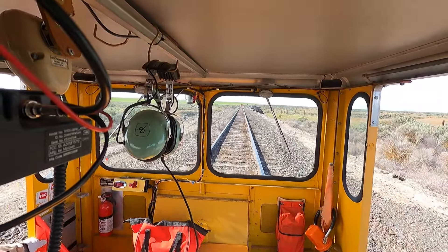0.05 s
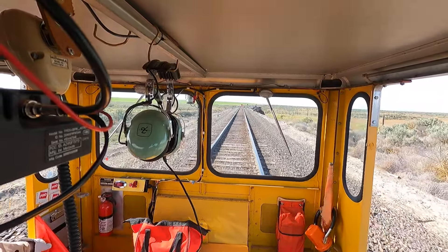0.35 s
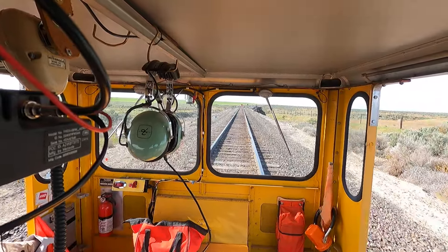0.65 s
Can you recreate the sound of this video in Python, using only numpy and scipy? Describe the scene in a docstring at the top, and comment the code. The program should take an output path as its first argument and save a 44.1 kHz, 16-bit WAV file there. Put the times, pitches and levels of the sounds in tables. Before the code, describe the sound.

A small railcar runs at steady speed, heard from the middle of its steel cab. A low engine drone and deep heaving rumble continue throughout, over a light rolling hiss and faint metallic ringing. Loose fittings rattle close by in irregular fits, growing busier near the end. The wheels clack over rail joints a few times in the first four seconds, and dips in the track give occasional deep thumps.

```python
"""Inside the steel cab of a small railcar at steady speed on jointed track, one microphone mid-cab.
The engine drones under the rumble of the body, which heaves on its springs and thumps over dips.
Below the floor the wheels roll with a hiss and clack over rail joints; rolling keeps a wheel and
a panel ringing. Close by, loose metal fittings chatter in fits as the car shakes, and the buckles
of small hanging gear tick."""
import sys
import numpy as np
from scipy import signal
from scipy.fft import rfft, irfft
from scipy.io import wavfile
from scipy.ndimage import uniform_filter1d

SR = 44100
rng = np.random.default_rng(int(sys.argv[2]) if len(sys.argv) > 2 else 0)


def digitize_waveform(pressure):
    """Quantize a signal to 16-bit integers and store it at the path in sys.argv[1].

    Rows of a 2-D input are taken as channels; values are limited to [-1, 1].
    """
    field = np.atleast_2d(pressure).T
    bounded = np.clip(field, -1, 1)
    quanta = np.round(bounded * 32767).astype(np.int16)
    wavfile.write(sys.argv[1], SR, quanta)


N = 283106
TIME = np.arange(N) / SR


def amp(db):
    return 10 ** (np.asarray(db) / 20)


def unit_rms(x):
    return x / np.sqrt(np.mean(x ** 2) + 1e-20)


def curve(rows):
    """Rows of (seconds, value) read at every sample."""
    return np.interp(TIME, *np.transpose(rows))


def add(mix, start_s, sound):
    part = mix[max(round(start_s * SR), 0):][:len(sound)]
    part += sound[:len(part)]


def decay(t, t60):
    return np.exp(-np.log(1000) * t / t60)


def drift(rate_hz):
    """A random wander of unit rms, mostly slower than the rate."""
    hz = np.arange(N // 2 + 1) * SR / N
    return unit_rms(irfft(rfft(rng.standard_normal(N)) * np.exp(-(hz / rate_hz) ** 2), N))


def resonate(x, colour, modes=(), size=16384):
    """Causal filter of unit energy: a broad colour with resonances that ring on."""
    hz = abs(np.fft.fftfreq(size, 1 / SR))
    points_hz, points_db = np.transpose(colour)
    db = np.interp(np.log(hz + 1), np.log(points_hz), points_db)
    for centre, width, lift in modes:
        db += lift / (1 + (2 * (hz - centre) / width) ** 2)
    minimum_phase = np.exp(np.conj(signal.hilbert(np.log(amp(db)))))
    response = np.fft.ifft(minimum_phase).real[:size // 2]
    return signal.fftconvolve(x, response / np.linalg.norm(response))[:N]


def scatter(t60):
    """One blow spread into dense dying reflections by the metal and the cab."""
    t = np.arange(int(t60 * SR)) / SR
    return rng.choice([-1., 1.], len(t)) * decay(t, t60)


def blows(rows, t60, rise_s):
    """A track of scattered blows from rows of (seconds, dB)."""
    out = np.zeros(N)
    for start, db, *_ in rows:
        blow = scatter(t60)
        attack = 1 - np.exp(-np.arange(len(blow)) / (rise_s * SR))
        add(out, start, amp(db) * attack * blow)
    return out


def bout_power(rows, rise_s=0.0034, fall_s=0.024):
    """Summed power of bouts that each build up, hold and die away."""
    power = np.zeros(N)
    for start, length, db in rows:
        t = np.maximum(TIME - start, 0)
        attack = 1 - np.exp(-t / rise_s)
        release = np.exp(-np.maximum(t - length, 0) / fall_s)
        power += (amp(db) * attack * release) ** 2
    return power


# The crankshaft's speed. Each row: time in seconds, turns per second.
CRANK_SPEED = [(0, 33.67), (1.5, 33.81), (2.2, 33.6), (3.2, 33.31), (6.42, 33.44)]
# Engine tones in the cab. Each row: multiple of the crankshaft speed, rms level in dB.
ENGINE_ORDERS = [(1, -25), (2, -27.5), (2.5, -35), (3, -27), (4, -46.5), (5, -41.5), (6, -46), (7, -56)]
# Hums of the drive train. Each row: frequency in Hz, rms level in dB.
DRIVE_HUMS = [(80, -39), (110, -40), (195, -46.5), (212, -47), (238.5, -52)]
def engine(order_waver=0.21, hum_waver=0.79):
    """The engine drones at orders of the crankshaft, slightly uneven, over wandering drive-train hums."""
    turns = np.cumsum(curve(CRANK_SPEED)) / SR
    out = np.zeros(N)
    for multiple, db in ENGINE_ORDERS:
        phase = 2 * np.pi * (multiple * turns + rng.random())
        out += amp(db) * unit_rms((1 + order_waver * drift(6.7)) * np.sin(phase))
    for hz, db in DRIVE_HUMS:
        phase = 2 * np.pi * (hz * TIME + rng.random()) + 1.49 * drift(4.5)
        out += amp(db) * unit_rms((1 + hum_waver * drift(10.3)) * np.sin(phase))
    return out


# The body's rumble from inside. Each row: frequency in Hz, relative level in dB.
RUMBLE_COLOUR = [(3, -2), (10, 1), (22, -1), (40, -9.5), (60, -19), (105, -17), (128, -24), (200, -24.5),
                 (232, -29), (262, -36.5), (330, -44), (1500, -120)]
# The body heaving on its springs. Each row: time in seconds, relative dB before scaling by heave_depth.
BODY_HEAVE = [(0, -17), (1.3, -18.5), (1.8, -17), (2.6, -22), (3.1, -17), (3.9, -17), (4.4, -17.5),
              (4.8, -18), (5.35, -17.5), (6.42, -16)]
# Rumble above the deepest band. Each row: time in seconds, relative dB before scaling by upper_depth.
UPPER_RUMBLE_LEVEL = [(0.0, -34.5), (1.0, -27.5), (3.2, -31.5), (3.27, -38.5), (4.34, -27.5), (4.52, -34),
                      (5.63, -30), (6.01, -32), (6.11, -23.5), (6.42, -37.5)]
def body_rumble(level_db=-15, heave_depth=0.68, upper_depth=0.99, split_hz=58):
    """The deepest rumble swells as the car heaves; the rumble above it swells and sinks irregularly."""
    rumble = amp(level_db) * unit_rms(resonate(rng.standard_normal(N), RUMBLE_COLOUR))
    deep = signal.sosfiltfilt(signal.butter(4, split_hz, fs=SR, output="sos"), rumble)
    upper = rumble - deep
    out = np.zeros(N)
    for band, depth, swell in [(deep, heave_depth, BODY_HEAVE), (upper, upper_depth, UPPER_RUMBLE_LEVEL)]:
        steady = band / np.sqrt(uniform_filter1d(band ** 2, size=9000))
        out += band.std() * unit_rms(steady * amp(depth * curve(swell)))
    return out


# Rolling noise from under the floor. Each row: frequency in Hz, relative level in dB.
ROLLING_COLOUR = [(200, -8), (380, 0.5), (700, -5.5), (820, -10.5), (1250, -9), (1800, -11.5),
                  (3100, -10.5), (4300, -17.5), (5200, -22), (5900, -28), (7200, -29), (8600, -34.5),
                  (10400, -37.5), (15500, -41)]
# Resonances and hollows of the steel body. Each row: centre in Hz, width in Hz, lift in dB.
STEEL_MODES = [(497.6, 17, 6.5), (590, 19, 5), (683, 23, 6.5), (723, 14, 5), (845, 20, 7), (1023, 45, 2.5),
               (1055, 71, 3.5), (1256, 46, 4.5), (1390, 87, -4), (1544, 73, 10.5), (1554, 51, -4.5),
               (1801, 206, 7), (2207, 13, 7.5), (2202, 10.4, 5), (2260, 57, 3.5), (2478, 76, -9.5),
               (2685, 31, 2.5), (2840, 25, -4.5), (2802, 43, 3.5), (2859, 193, 9), (2970, 6.2, 8.5),
               (3040, 20, -0.5), (3156, 68, 5), (3370, 9.8, 6), (3555, 95, 3.5), (3770, 51, 7),
               (4450, 250, -5), (5086, 420, 4.5), (5290, 29, 6)]
def rolling(shake_db, level_db=-37.5, shake_share=0.14, flutter_db=0.5):
    """Rail roughness drives the steel, a little harder where the car shakes."""
    drive_db = shake_share * shake_db + flutter_db * drift(33)
    roughness = rng.standard_normal(N) * amp(drive_db)
    return amp(level_db) * unit_rms(resonate(roughness, ROLLING_COLOUR, STEEL_MODES))


# A wheel ringing as it rolls. Each row: time in seconds, rms level in dB.
WHEEL_RING_LEVEL = [(0, -50), (0.35, -55), (0.7, -52), (1.2, -52), (1.5, -47), (2.3, -51), (3.5, -53),
                    (4.3, -52), (4.8, -56), (5.9, -56), (6.42, -50)]
# A cab panel ringing up. Each row: start in seconds, length in seconds, held level in dB.
PANEL_BOUTS = [(0.01, 0.14, -41), (1.68, 0.069, -41.5), (3.93, 0.06, -41.5), (4.3, 0.054, -39.5),
               (4.62, 0.11, -41.5), (6.35, 0.053, -43)]
def wheel_and_panel_ring(wheel_hz=976.0, panel_hz=359.6, panel_rest_db=-51):
    """Rolling keeps a wheel mode and a cab panel ringing, each coming and going."""
    wheel = amp(curve(WHEEL_RING_LEVEL))
    panel = np.sqrt(amp(panel_rest_db) ** 2 + bout_power(PANEL_BOUTS))
    out = np.zeros(N)
    for hz, width_hz, level in [(wheel_hz, 22, wheel), (panel_hz, 15, panel)]:
        swing = drift(width_hz) + 1j * drift(width_hz)  # shaken at random, it wanders in size and phase
        swing /= np.sqrt(uniform_filter1d(abs(swing) ** 2, size=9000) / 2)
        out += level * (swing * np.exp(2j * np.pi * hz * TIME)).real
    return out


# Fits of shaking. Each row: start in seconds, length in seconds, strength in dB.
SHAKE_FITS = [(0.055, 0.052, -34), (0.135, 0.031, -39.5), (0.665, 0.023, -42.5), (0.795, 0.03, -32),
              (0.845, 0.04, -36.5), (1.33, 0.1, -40), (1.683, 0.06, -33), (1.755, 0.11, -32),
              (1.968, 0.032, -35), (2.105, 0.083, -34), (2.289, 0.052, -36.5), (2.615, 0.037, -37),
              (2.849, 0.063, -37.5), (3.0, 0.13, -35.5), (3.17, 0.06, -40.5), (3.32, 0.024, -40.5),
              (3.568, 0.17, -40), (3.835, 0.079, -43), (3.968, 0.057, -29), (4.055, 0.021, -31.5),
              (4.273, 0.17, -38), (4.475, 0.093, -34.5), (4.792, 0.02, -35.5), (4.903, 0.055, -31.5),
              (5.14, 0.15, -31.5), (5.3, 0.1, -29.5), (5.544, 0.078, -32), (5.657, 0.057, -35),
              (5.742, 0.13, -32.5), (5.926, 0.033, -34), (6.176, 0.025, -33), (6.241, 0.066, -31)]
def shaking(idle_db=-45.5, swing_db=2, swing_hz=18):
    """How hard the car shakes its fittings, in dB: fits over a faint, restless idle."""
    idle = amp(idle_db + swing_db * np.tanh(drift(swing_hz)))
    return 10 * np.log10(idle ** 2 + bout_power(SHAKE_FITS))


def chatter(shake_db, gain_db=-0.5, contacts_per_s=1000, t60=0.03):
    """Shaken fittings buzz against the steel; each contact leaves a short scatter, and these overlap."""
    contacts = (rng.random(N) < contacts_per_s / SR).astype(float)
    power_kept = decay(1 / SR, t60) ** 2  # from one sample to the next
    power = signal.lfilter([1], [1, -power_kept], contacts) + 1e-3
    power /= uniform_filter1d(power, size=1000)
    return amp(gain_db + shake_db) * np.sqrt(power) * rng.standard_normal(N)


# Loose metal close by. Each row: frequency in Hz, relative level in dB.
FITTING_COLOUR = [(300, -30), (900, -17.5), (1400, -14.5), (1700, -5.5), (2400, 0.5), (2900, 0), (3200, 2),
                  (3800, -3.5), (4350, -20), (5150, -17), (5900, -22), (8000, -64), (15000, -64)]
# Single hard knocks of the fittings. Each row: start in seconds, relative level in dB, ping in Hz.
FITTING_KNOCKS = [(0.0582, -48, 2940), (0.6803, -27, 2900), (0.8049, -28, 2850), (1.5702, -21.5, 2920),
                  (1.775, -19, 2710), (1.9787, -32, 2860), (2.111, -25, 2810), (3.033, -22, 2820),
                  (4.519, -27, 2800), (4.9032, -23, 2850), (4.95, -18, 2760), (5.1641, -18, 2880),
                  (5.3065, -21, 3290), (5.3468, -24, 2880), (5.3919, -19, 3180), (5.5472, -24, 3030),
                  (5.7876, -18, 3020), (5.8219, -16, 2890), (5.9183, -17, 2910), (5.9348, -19.5, 2920),
                  (6.175, -20, 2890), (6.2524, -23, 2780)]
def loose_fittings(shake_db, knock_db=-11, ping_db=-9.5, t60=0.11):
    """Chatter and single knocks ring the steel of the cab; each knocked piece adds its own short ping."""
    buzz = chatter(shake_db)
    knocks = amp(knock_db) * blows(FITTING_KNOCKS, t60, rise_s=0.0003)
    out = resonate(buzz + knocks, FITTING_COLOUR, STEEL_MODES)
    t = np.arange(int(t60 * SR)) / SR
    for start, db, hz in FITTING_KNOCKS:
        add(out, start, amp(db + ping_db) * decay(t, t60) * np.sin(2 * np.pi * hz * t))
    return out


# Wheels striking joints, front axle then rear. Each row: start in seconds, relative level in dB.
JOINT_STRIKES = [(0.795, -20.5), (1.755, -13), (1.8333, -23), (3.9806, -16), (4.0633, -30)]
# The clank from under the floor. Each row: frequency in Hz, relative level in dB.
CLANK_COLOUR = [(200, -7), (850, -6), (1000, 4), (1400, -9), (1700, 2), (2400, 4.5), (2900, -2),
                (3750, 4.5), (4350, -8.5), (5100, -10.5), (6500, -27.5), (15000, -61)]
# A struck wheel. Each row: frequency in Hz, level in dB relative to the strike, seconds to fall 60 dB.
STRUCK_WHEEL_MODES = [(980, -16, 0.26), (1796, -8.5, 0.12), (2227, -19, .17), (2808, -9.5, 0.086),
                      (2900, -9.5, 0.18)]
def rail_joints(clank_db=-9, t60=0.19, rise_s=0.004):
    """Each axle drops into the rail gap and strikes the next rail end: a clank, and the wheel rings on."""
    out = amp(clank_db) * resonate(blows(JOINT_STRIKES, t60, rise_s), CLANK_COLOUR, STEEL_MODES)
    t = np.arange(SR // 2) / SR
    attack = 1 - np.exp(-t / rise_s)
    for start, strike_db in JOINT_STRIKES:
        for hz, mode_db, mode_t60 in STRUCK_WHEEL_MODES:
            tone = np.sin(2 * np.pi * (hz * t + rng.random()))
            add(out, start, amp(strike_db + mode_db) * attack * decay(t, mode_t60) * tone)
    return out


# Light ticks of gear hanging in the cab. Each row: start in seconds, relative level in dB.
GEAR_TICKS = [(0.8044, -43), (0.8874, -50), (1.007, -43), (1.5972, -41), (2.1644, -44), (2.2781, -59),
              (2.5226, -45), (2.5444, -44), (2.994, -45), (3.4599, -47), (3.9609, -43), (4.3444, -48),
              (4.6228, -45), (5.2499, -44), (6.0865, -41), (6.1743, -42)]
# A tick at close range. Each row: frequency in Hz, relative level in dB.
TICK_COLOUR = [(1500, -10), (5000, 3.5), (7200, 3), (9000, -5), (10400, -3), (11500, -18), (15000, -17)]
# The ring of the buckles. Each row: centre in Hz, width in Hz, lift in dB.
BUCKLE_MODES = [(7000, 300, 4), (10300, 350, 6)]
def hanging_gear(shake_db, tick_db=-9.5, jingle_db=-68, shake_share=0.17, taps_per_s=70, t60=0.12):
    """Buckles tap lightly, and jingle faintly all the while as the car shakes."""
    taps = rng.uniform(0.63, 1, N) * (rng.random(N) < taps_per_s / SR)
    taps *= amp(shake_share * shake_db)
    jingle = amp(jingle_db) * unit_rms(signal.fftconvolve(taps, scatter(t60))[:N])
    ticks = amp(tick_db) * blows(GEAR_TICKS, t60, rise_s=0.001)
    return resonate(ticks + jingle, TICK_COLOUR, BUCKLE_MODES)


# Thumps from the track. Each row: start in seconds, peak level in dB, pitch in Hz, length in seconds.
DIP_THUMPS = [(1.864, -9.5, 42, 0.118), (2.264, -6, 47.5, 0.068), (4.509, -11, 36.2, 0.14),
              (5.261, -8.5, 34.9, 0.13)]
def track_dips():
    """Each dip in the track thumps the body through a few deep cycles."""
    out = np.zeros(N)
    for start, db, hz, length in DIP_THUMPS:
        t = np.arange(int(length * SR)) / SR
        add(out, start, -amp(db) * np.sin(2 * np.pi * hz * t) * np.hanning(len(t)))
    return out


def scene():
    """Everything as it reaches one microphone in the middle of the cab."""
    shake_db = shaking()
    running = engine() + body_rumble() + rolling(shake_db) + wheel_and_panel_ring()
    clatter = loose_fittings(shake_db) + rail_joints() + hanging_gear(shake_db)
    return (running + clatter + track_dips())[None]


def record(dry):
    """The recorder dulls the top octave and ends at its band limit."""
    dulling = signal.firwin2(129, [0, 10800, 13000, 16000, SR / 2], amp([0, 0, -2.5, -4, -4]), fs=SR)
    band_limit = signal.firwin(511, cutoff=15700, window=("kaiser", 9), fs=SR)
    return signal.oaconvolve(dry, np.convolve(dulling, band_limit)[None], "same")


dry = scene()
out = record(dry)
digitize_waveform(out)
```